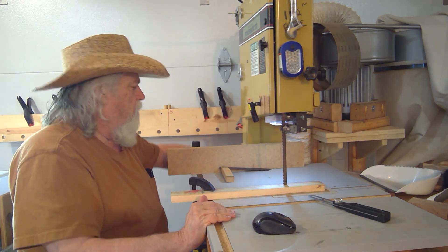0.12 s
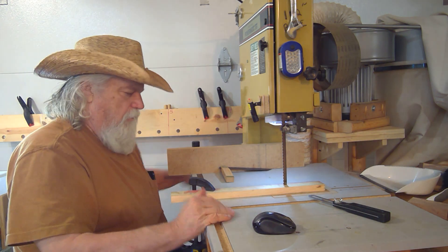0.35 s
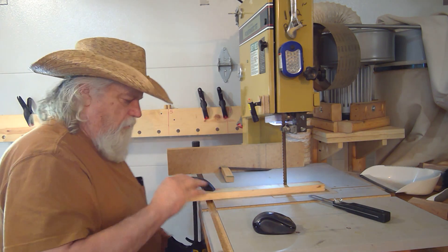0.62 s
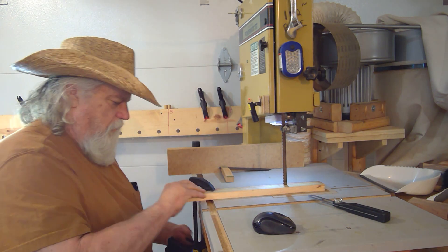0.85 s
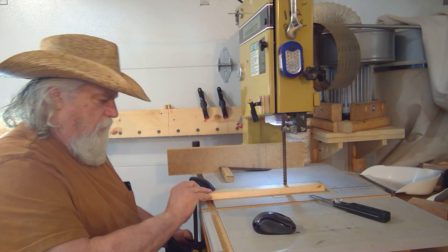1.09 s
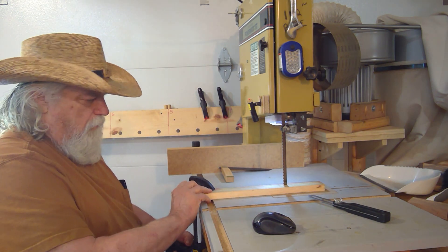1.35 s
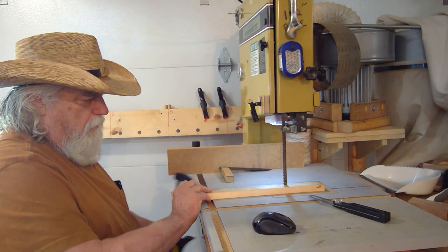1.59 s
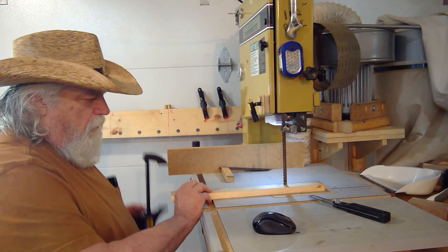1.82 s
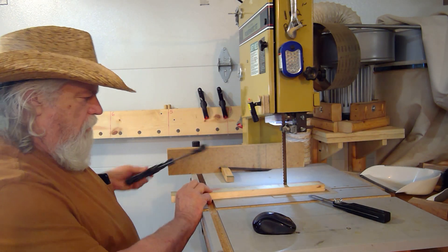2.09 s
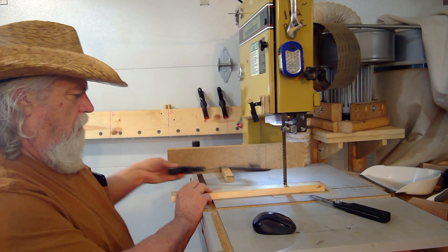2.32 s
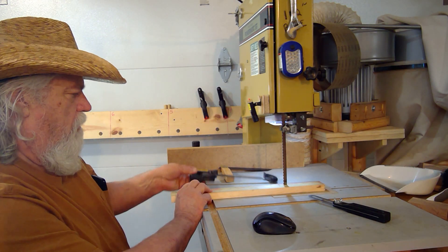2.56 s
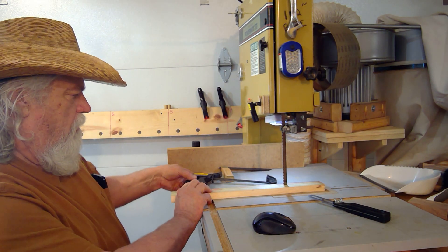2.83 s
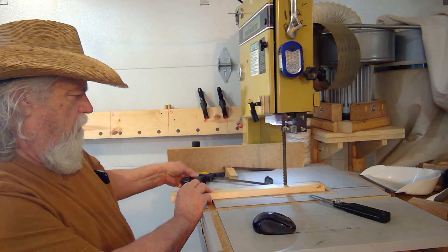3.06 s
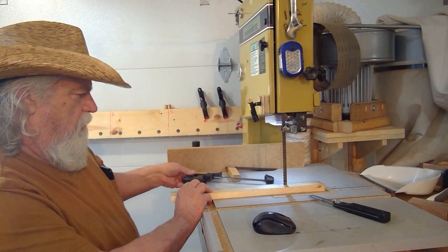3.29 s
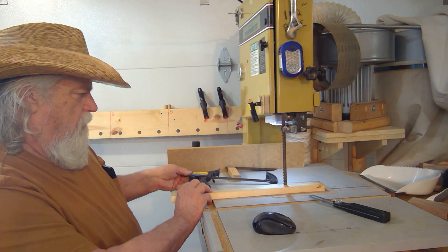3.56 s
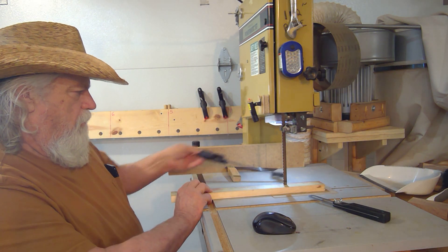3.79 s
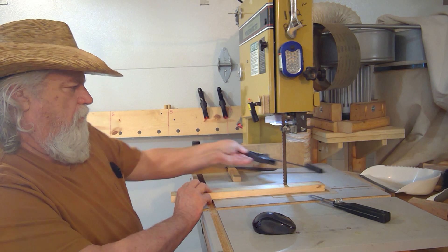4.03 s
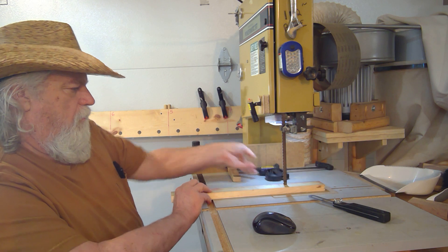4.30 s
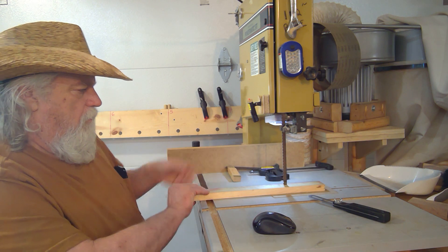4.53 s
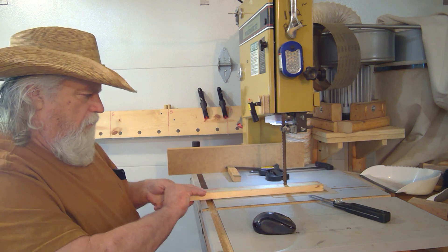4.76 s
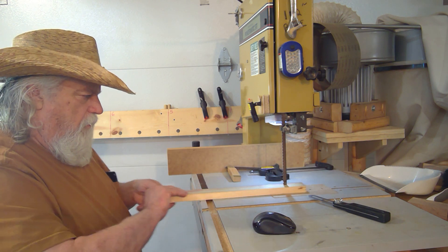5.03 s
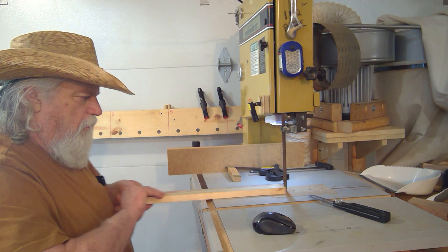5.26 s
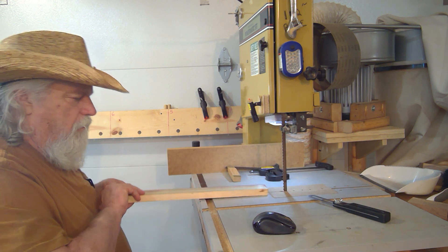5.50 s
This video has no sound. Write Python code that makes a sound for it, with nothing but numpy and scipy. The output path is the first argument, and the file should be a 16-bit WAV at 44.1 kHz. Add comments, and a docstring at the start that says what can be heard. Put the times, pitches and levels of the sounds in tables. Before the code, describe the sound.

In a small workshop, a bar clamp is loosened and set down with sharp knocks and clatter, then a wood strip scrapes across a metal table.

```python
"""In a small workshop, a bar clamp and a strip of wood are handled on the cast table of a saw.
Blows ring table, wood and bar as decaying modes with a rough rattle; clamp and strip drag and squeak
as stick-slip grains and noise through narrow resonances. Hand and sleeve rub as banded grains, thin tones
waver, the stand shakes as low noise, and a quiet room hum of noise and faint tones lies below."""
import sys
import numpy as np
from scipy import signal
from scipy.fft import rfft, irfft, next_fast_len
from scipy.io import wavfile
from scipy.ndimage import uniform_filter1d

SR = 44100
rng = np.random.default_rng(int(sys.argv[2]) if len(sys.argv) > 2 else 0)


def invert_db(level):
    """Linear amplitude ratio for a level in decibels (20 dB per decade), elementwise."""
    return 10 ** (np.asarray(level, dtype=float) / 20)


def to_wav(s):
    """Save 16-bit WAV."""
    ch = np.atleast_2d(s).T  # columns
    pcm = np.round(np.clip(ch, -1, 1) * 32767)  # PCM
    wavfile.write(sys.argv[1], SR, pcm.astype(np.int16))


N = 248439

# Colour of the room's noise floor. Each row: frequency in Hz, relative level in dB.
ROOM_TONE_COLOUR = [(15, -34.5), (25, 3), (105, -6.5), (153, -4.5), (236, -5), (451, -12), (677, -11.5),
                    (887, -17.5), (1020, -15), (1100, -17), (9840, -36), (11300, -35.5), (16000, -39)]
# Faint continuous pitches in the room. Each row: pitch in Hz, level in dB before a 9 dB lift, waver in dB.
HUM_TONES = [(240, -81, 2), (10890, -98, 2)]
# The stand sways as it is leant on. Each row: time in seconds, sway level in dB.
STAND_SWAY = [(0.0, -77.5), (1.32, -78), (1.55, -49), (1.69, -62.5), (2.45, -81), (2.49, -60), (2.9, -52),
              (2.95, -61.5), (3.23, -47.5), (3.39, -56), (3.78, -51.5), (3.98, -68), (4.58, -51),
              (4.83, -69), (5.36, -48), (5.63, -52)]
# How long the room rings. Each row: frequency in Hz, time to fall 60 dB in seconds.
ROOM_DECAY = [(150, 0.62), (300, 0.27), (600, 0.34), (1200, 0.26), (2400, 0.25), (4800, 0.24), (9600, 0.17),
              (14000, 0.082)]
# Stereo tilt. Each row: frequency in Hz, left over right in dB.
LEFT_OVER_RIGHT = [(60, -1.5), (200, 0.95), (500, 2), (1000, 3.5), (2000, 7), (4000, 6), (8000, 11.5),
                   (13000, 11)]
# Strokes of hand and sleeve. Each row: start, peak and fade mark in seconds (the mark sometimes
# before the peak), rub level and fine rustle level in dB.
HAND_STROKES = [(-.02, 0.005, 0.13, -48.5, -64.5), (.08, .36, 0.28, -49.5, -75.5),
                (0.357, 0.396, 0.34, -46, -84.5), (.5, .53, 0.71, -51, -63), (.84, .9, 1.05, -71, -66),
                (2.05, 2.125, 2.17, -69, -76.5), (2.18, 2.215, 2.27, -71, -70),
                (2.3, 2.46, 2.48, -64.5, -75.5), (2.56, 2.79, 2.875, -48.5, -60.5)]
# Colour of skin and cloth on wood. Each row: frequency in Hz, relative level in dB.
RUB_COLOUR = [(710, -56.5), (1200, -34.5), (1600, -16), (1680, -9.5), (2080, -6.5), (2520, -3),
              (4040, -1.5), (7290, -11.5), (9000, -28), (11700, -56), (19800, -120)]
# Thin wavering tones, heard while the clamp is in hand. Each row: pitch in Hz, level in dB.
BAR_TONES = [(5986, -92), (6503, -86), (7181, -95)]
# Metal and wood slipping, and the short tick of a light blow at 3.28 s. Each row: start in seconds, length in
# seconds, pitch in Hz, width in Hz, level in dB.
SQUEAKS_AND_TICK = [(2.189, .06, 1970, 250, -65), (3.277, 0.0086, 1970, 392, -39.5),
                    (3.276, 0.0099, 2400, 250, -56.5), (3.27, 0.024, 4336, 60, -70.5),
                    (4.658, 0.034, 3430, 49.5, -68), (4.836, 0.037, 2570, 50, -63),
                    (4.892, 0.021, 2570, 50, -65), (4.923, 0.02, 2572, 50.8, -56),
                    (5.259, .025, 1896, 80, -51.5), (5.477, 0.037, 2496, 78.4, -61.5),
                    (5.486, 0.053, 1880, 160, -58)]
# Passes of the clamp over the table. Each row of a pass: time in seconds, groan in dB, scratch in dB.
CLAMP_PASSES = [
    [(2.66, -52, -59), (2.7, -39.5, -74), (2.81, -70, -83), (2.9, -75, -99)],
    [(2.96, -37.5, -43.5), (3.01, -39.5, -43), (3.05, -36.5, -47.5), (3.218, -46, -74.5),
     (3.282, -46.5, -78), (3.336, -57, -97), (3.41, -62.5, -63)],
]
# Passes of the wood strip over the table. Each row of a pass: time in seconds, groan in dB, scratch in dB.
STRIP_PASSES = [
    [(4.62, -78, -92), (4.66, -53, -78), (4.74, -70, -108), (4.846, -67, -84.5), (4.97, -51.5, -64),
     (5.044, -37, -54.5), (5.152, -35.5, -51), (5.234, -36, -57), (5.276, -35, -46.5), (5.338, -33.5, -51),
     (5.49, -41.5, -61.5), (5.63, -56, -91)],
]
# The clamp catches on grit. Each row: time in seconds, grit in dB, fine grit in dB.
CLAMP_SNAGS = [(2.702, -61.5, -87), (2.977, -36.5, -45.5), (2.995, -62.5, -52), (3.04, -48, -61.5),
               (3.282, -75.5, -80)]
# The strip catches on grit. Each row: time in seconds, grit in dB, fine grit in dB.
STRIP_SNAGS = [(4.648, -72, -61.5), (4.671, -74, -74), (4.85, -60, -66.5), (4.874, -55, -70),
               (4.9, -52.5, -67), (4.935, -54.5, -64.5), (5.034, -59, -54), (5.06, -66.5, -60),
               (5.1, -56, -63), (5.152, -60, -60.5), (5.19, -60, -64), (5.276, -77, -68),
               (5.365, -50, -53.5), (5.488, -60, -76.5)]
# The table under the dragged clamp. Each row: mode in Hz, level in dB, time to fall 60 dB in seconds.
CLAMP_GROAN_MODES = [(213, -14, 0.14), (250, -5, 0.07), (340, 14, 0.019), (444, -7, 0.16), (514, -3.5, 0.1),
                     (580, -6.5, 0.049), (720, 1.5, 0.04), (785, -20, 0.17)]
# The low modes under the dragged strip. Each row: mode in Hz, level in dB, time to fall 60 dB in seconds.
STRIP_GROAN_MODES = [(220, -24, 0.052), (250, 12.5, 0.043), (340, 0, 0.11), (430, -1, 0.031),
                     (491.8, 4.5, 0.1), (536, 0.5, 0.043), (637, 0, 0.043), (720, -14, 0.034)]
# Resonances in the clamp's scratch. Each row: frequency in Hz, width in Hz, level in dB.
CLAMP_SCRATCH_PEAKS = [(1200, 23, 1.5), (1920, 100, 9.5), (3500, 38.2, -28), (3700, 45, -30),
                       (4160, 50, -40), (5680, 200, 1), (6550, 110, -2), (6900, 83, -20.5), (8900, 98, -15),
                       (9150, 120, -15), (10810, 57, -17.5), (11790, 130, -30), (13300, 44, -23.5),
                       (14300, 45, -11)]
# Resonances in the strip's scratch. Each row: frequency in Hz, width in Hz, level in dB.
STRIP_SCRATCH_PEAKS = [(1144, 34, -8.5), (1624, 27, 3), (1880, 58, 6), (2620, 250, 2.5), (3060, 51, -7.5),
                       (4180, 150, 8), (5200, 140, -0.5), (6400, 160, -18), (8330, 240, -9.5),
                       (9200, 120, -18), (9820, 82, -13), (11700, 140, -22), (12700, 300, -14),
                       (14900, 600, -10)]
# Every blow. Each row: time in seconds, knock in dB, thud in dB, crack in dB, favoured pitch in Hz.
BLOW_LIST = [(1.413, -7.5, -10, -20.5, 657), (1.418, -13.5, -19.5, -12.5, 470),
             (1.423, -17.5, -16, -27.5, 257.1), (1.445, -15.5, -21.5, -37, 160), (1.49, -30, -26, -46, 199),
             (1.896, -36, -45, -30, 4170), (2.475, -15.5, -25, -28, 1337),
             (2.658, -25.5, -42.5, -64.5, 375), (2.69, -28.5, -36.5, -62, 245),
             (2.712, -29.5, -34, -67, 380), (2.739, -49, -35.5, -45.5, 371),
             (2.954, -10.5, -30.5, -49.5, 514), (2.975, -28.5, -33, -33.5, 249),
             (3.018, -20, -37.5, -41.5, 360), (3.042, -25.5, -41, -34, 5620), (3.25, -48, -39, -76, 453),
             (3.423, -16, -32.5, -27, 5620), (3.444, -19, -35, -33.5, 363), (3.55, -19, -26.5, -77, 232.7),
             (3.593, -50, -39.5, -79, 230), (3.655, -19.5, -27.5, -34.5, 1773),
             (3.664, -27.5, -31.5, -40.5, 1550), (3.742, -27.5, -59.5, -62, 1380),
             (3.825, -35.5, -45, -97.5, 876), (4.107, -18, -28, -27.5, 2390), (4.11, -24, -40, -31, 3340),
             (4.112, -6, -27, -33.5, 749), (4.305, -17.5, -23, -27.5, 2690),
             (4.321, -20.5, -37, -43.5, 1035), (4.398, -9, -17.5, -24.5, 241),
             (4.419, -21.5, -29.5, -24.5, 247), (4.459, -36, -38.5, -47, 250)]
# The ranges knock, thud, clank, crack and snap. Each row: low edge in Hz, high edge in Hz,
# contact time in seconds, ring in dB, rattle in dB.
BLOW_RANGES = [(470, 1150, 0.0035, -18, -7.5), (126, 450, 0.0051, -6.5, -1.5), (1261, 3360, 0.0036, -17, 0),
               (3830, 6960, 0.0038, -19.5, 1), (7700, 14000, 0.002, -12, 2)]
# What table and clamp ring with. Each row: mode in Hz, level in dB, time to fall 60 dB in seconds.
BODY_MODES = [(132.6, -5.5, 0.056), (159, -8, 0.091), (217, -0.5, 0.2), (245, -3, 0.11), (259.2, -1.5, 0.3),
              (292, -4, 0.2), (352.4, -1, 0.22), (401, -0.5, .08), (470, 8, 0.036), (569, -3, 0.03),
              (657, -1, .08), (772.3, 2.5, 0.085), (810, 9, 0.014), (910, 3, 0.03), (1035, -4, 0.19),
              (1339, 17.5, 0.0061), (1320, -5.5, 0.014), (1550, -3.5, 0.013), (1780, -11.5, 0.19),
              (1820, -8, 0.027), (1880, 7, 0.027), (2106, -2.5, 0.092), (2203, -12.5, 0.067),
              (2440, -6, 0.042), (2551, -7.5, 0.035), (2800, 3, 0.026), (3100, -2, .03), (3340, 5, 0.035),
              (3930, -5, .03), (4170, 1, .03), (4950, 2.5, 0.011), (5300, -8, 0.05), (5620, -1.5, 0.12),
              (6580, -6, 0.018), (7700, 0, 0.062)]


def rms_one(x):
    """Scaled to unit rms."""
    return x / np.sqrt(np.mean(x ** 2) + 1e-20)


def at_hz(points, hz):
    """Table value on a log-frequency axis."""
    table_hz, values = np.array(points).T
    return np.interp(np.log(hz), np.log(table_hz), values)


def band(x, low_hz, high_hz, order=2):
    """Butterworth band-pass."""
    edges_hz = [low_hz, min(high_hz, .45 * SR)]
    return signal.sosfilt(signal.butter(order, edges_hz, "band", fs=SR, output="sos"), x)


def coloured(x, spectrum):
    """Steady noise given a spectrum in dB, at unit rms."""
    hz = np.maximum(np.fft.rfftfreq(N, 1 / SR), 1)
    return rms_one(irfft(rfft(x) * invert_db(at_hz(spectrum, hz)), N))


def ring(force, hz, t60):
    """A damped mode: a unit click sets a sine of height 1 ringing."""
    radius = invert_db(-60 / (t60 * SR))
    turn = 2 * np.pi * hz / SR
    poles = [1, -2 * radius * np.cos(turn), radius * radius]
    return signal.lfilter([0, np.sin(turn)], poles, force + 1e-18)


def grains(per_s, spread_db):
    """Random clicks of uneven size and either sign, at unit rms."""
    sizes = invert_db(spread_db * np.minimum(rng.exponential(1, N), 5)) * rng.choice([-1, 1], N)
    return rms_one(sizes * (rng.random(N) < per_s / SR))


def waver(per_s):
    """Slow random wander: normal steps, two per cycle, joined by straight lines."""
    steps = rng.standard_normal(N // 300 + 2)
    return np.interp(np.arange(N) * 2 * per_s / SR, np.arange(len(steps)), steps)


def gains(tables):
    """Level curves to gains in time, with 20 ms fades outside each table."""
    t, out = np.arange(N) / SR, 0
    for rows in tables:
        s, *columns = np.transpose(rows)
        fade = np.clip(np.minimum(t - s[0] + .02, s[-1] + .02 - t) / .02, 0, 1)
        out = out + fade * invert_db(np.array([np.interp(t, s, c) for c in columns]))
    return out


def bumps(peak_s, rise_db_per_s, fall_db_per_s, *levels_db):
    """Gains that rise to each peak and fall away, straight in dB; overlaps add in power."""
    age = np.arange(0, N + 32, 32) / SR - np.asarray(peak_s)[:, None]   # one point every 32 samples
    rise = age * np.reshape(rise_db_per_s, (-1, 1))
    fall = -age * np.reshape(fall_db_per_s, (-1, 1))
    shape = invert_db(np.where(age < 0, rise, fall))
    at, points = np.arange(N) / 32, np.arange(age.shape[1])
    return [np.interp(at, points, np.sqrt(invert_db(db) ** 2 @ shape ** 2)) for db in levels_db]


def room_tone():
    """Faint broad noise, alike on both sides in the bass, with two faint continuous tones that waver slightly."""
    level_db = -67.5
    mid, left, right = (coloured(rng.standard_normal(N), ROOM_TONE_COLOUR) for k in range(3))
    side = band(np.array([left, right]), 500, 17000, order=1)
    bass_mid = mid - band(mid, 420, 17000, order=1)
    t, hum = np.arange(N) / SR, 0
    for hz, db, waver_db in HUM_TONES:
        hum = hum + invert_db(db + 9 + waver_db * waver(2.1)) * np.sin(2 * np.pi * hz * t)
    return invert_db(level_db) * (side + bass_mid) + hum


def shake():
    """Low sway and boom carried through the floor, a little different on each side; thuds jolt the boom."""
    boom_over_sway_db, jolt_over_thud_db, jolt_t60_s = -0.5, -30.5, 0.34
    sway, = gains([STAND_SWAY])
    s, thud_db = np.transpose(BLOW_LIST)[[0, 2]]
    jolts = bumps(s + 0.0067, 1500, 60 / jolt_t60_s, thud_db + jolt_over_thud_db)[0]
    boom = invert_db(boom_over_sway_db) * sway + jolts
    mid, own = rng.standard_normal((2, 1, N)), rng.standard_normal((2, 2, N))
    low, high = mid + 0.28 * own
    return sway * rms_one(band(low, 32, 47)) + boom * rms_one(band(high, 78, 110))


def workshop(x):
    """Dense reflections: a strong early cluster off table and machine, then a tail dying band by band."""
    early_db, early_t60_s = 1, 0.02
    t = np.arange(SR // 2) / SR
    echo, edges_hz = 0, 100 * 2 ** np.arange(0, 7.5, 1 / 3)
    for low_hz, high_hz in zip(edges_hz, edges_hz[1:]):
        shared, own = rng.standard_normal(len(t)), rng.standard_normal((2, len(t)))
        apart = np.clip(0.3 + 0.25 * np.log2(low_hz / 200), .1, .95)   # the two sides share the bass
        noise = np.sqrt(1 - apart ** 2) * shared + apart * own
        tail = invert_db(-60 * t / at_hz(ROOM_DECAY, low_hz))
        early = invert_db(early_db - 60 * t / early_t60_s)
        onset = np.clip((t - .001) / 0.0022, 0, 1)
        part = band(noise * (tail + early) * onset, low_hz, high_hz)
        energy = np.sum(part ** 2, axis=1, keepdims=True)
        even = np.sqrt((high_hz - low_hz) / (SR / 2) / energy)   # no band is favoured
        bass_loss = invert_db(-5 * np.clip(np.log2(500 / low_hz), 0, 1))   # thin walls let the bass out
        echo = echo + part * even * bass_loss
    return signal.fftconvolve(x[None], echo, axes=1)[:, :N]


def strokes():
    """Rub and rustle gains that swell and fade in dB; nothing sounds before a stroke starts."""
    swell_db, fade_db = 14, 26.5   # start and fade mark lie this far under the peak
    t, out = np.arange(N) / SR, 0
    for start, peak, mark, *levels_db in HAND_STROKES:
        curve_db = np.interp(t, [start, peak, mark, mark + .1], [-swell_db, 0, -fade_db, -80])
        shape = invert_db(curve_db) * np.clip((t - start) / 0.021, 0, 1)
        out = out + invert_db(np.array(levels_db))[:, None] * shape
    return out


def rubs():
    """Skin and cloth on wood: dense grains in a broad band, a finer rustle above."""
    rub, rustle = strokes()
    skin = coloured(grains(6400, 1.2), RUB_COLOUR)
    cloth = rms_one(band(grains(9000, 2.6), 6900, 16000, order=4))
    return rub * skin + rustle * cloth


def sing():
    """The steel bar's thin tones: sines wavering in level."""
    from_s, to_s, waver_db = 1.6, 4.1, 6
    t, tones = np.arange(N) / SR, 0
    held = np.clip(np.minimum(t - from_s, to_s - t) / .1, 0, 1)
    for hz, db in BAR_TONES:
        tones = tones + invert_db(db + waver_db * waver(3)) * np.sqrt(2) * np.sin(2 * np.pi * hz * t)
    return held * tones


def squeaks():
    """Each slip, and the short tick of a blow, is a puff of noise through a narrow resonance."""
    out, t = np.zeros(N), np.arange(N) / SR
    for s, length, hz, width, db in SQUEAKS_AND_TICK:
        part = slice(int(s * SR), int((s + 2 * length) * SR))
        age = (t[part] - s) / length
        noise = rng.standard_normal(4410)
        tone = rms_one(band(noise, hz - width / 2, hz + width / 2))[-len(age):]
        puff = np.clip(8 * age, 0, 1) * np.exp(-age ** 3)
        out[part][:len(tone)] += invert_db(db) * tone * puff[:len(tone)]
    return out


def drag(passes, snags, modes, resonances, hiss):
    """Stick-slip grains shake the low modes; finer grit hisses and rings resonances under uneven pressure."""
    snag_rise_db_per_s, snag_fall_db_per_s = 1500, 264
    grit_db, fine_grit_db = -17.5, -27   # steady grit against the scratch
    groan, scratch = gains(passes)
    s, *snag_db = np.transpose(snags)
    grit, fine_grit = bumps(s, snag_rise_db_per_s, snag_fall_db_per_s, *snag_db)
    levels = scratch, grit + invert_db(grit_db) * scratch, fine_grit + invert_db(fine_grit_db) * scratch
    slips = grains(1500, 3.0)
    body = sum(invert_db(db + 3.6 * waver(18)) * ring(slips, hz, t60) for hz, db, t60 in modes)
    out = groan * rms_one(band(body, 210, 720))
    for level, low_hz, high_hz in zip(levels, [950, 3600, 8000], [3600, 8000, 16000]):
        fine, rings = grains(4000, 1.3), 0
        for hz, width, db in resonances:
            if low_hz < hz < high_hz:
                # a narrower resonance rings longer
                rings = rings + invert_db(db + 6 * waver(15)) * rms_one(ring(fine, hz, 2.2 / width))
        texture = rms_one(rings) + hiss * rms_one(band(fine, low_hz, high_hz))
        pressure = invert_db(3.9 * waver(30))
        out += level * pressure * rms_one(texture)
    return out


def strengths():
    """Each blow's strength in the five ranges; a blunt blow loses treble steadily."""
    clank_share, snap_share, snap_db = 0.52, 1.2, -4   # shares of the step from knock to crack
    bar_hz, bar_oct, bar_db = 2200, 0.86, 14.5   # a blow that favours the steel bar's pitch clanks harder
    s, knock, thud, crack, favoured_hz = np.transpose(BLOW_LIST)
    bar = bar_db * np.exp(-(np.log2(favoured_hz / bar_hz) / bar_oct) ** 2)
    clank = knock + clank_share * (crack - knock) + bar
    snap = knock + snap_share * (crack - knock) + snap_db
    return knock, thud, clank, crack, snap


def blows():
    """In each range a contact gives a clean tap that rings the modes and a rough rattle that swells and dies."""
    favour_peak_db, favour_oct, tick_db = 11.5, 0.12, 4.5
    at_s, favoured_hz = np.transpose(BLOW_LIST)[[0, -1]]
    span = np.arange(1500)
    at, out = np.round(at_s * SR).astype(int)[:, None] + span, np.zeros(N)
    chatter = uniform_filter1d(rng.standard_normal(at.shape), size=36, axis=1) * 6
    ticks = invert_db(tick_db * chatter)   # the contact chatters unevenly
    for (low_hz, high_hz, contact_s, ring_db, rattle_db), strength_db in zip(BLOW_RANGES, strengths()):
        age = span / SR / contact_s
        swell = np.minimum(1.8 * age + 0.041, 1) * np.exp(-age)
        rough = ticks * rng.standard_normal(at.shape) * swell
        rattle = np.zeros(N)
        np.add.at(rattle, at, rough * invert_db(strength_db)[:, None])
        width_gain = np.sqrt(SR / 2 / (high_hz - low_hz))   # makes up for the noise the band removes
        out += invert_db(rattle_db) * width_gain * band(rattle, low_hz, high_hz)
        for hz, level_db, t60 in BODY_MODES:
            if low_hz <= hz < high_hz:
                octaves_up = np.log2(hz / favoured_hz)
                favour_db = favour_peak_db * np.exp(-(octaves_up / favour_oct) ** 2)
                favour_db -= 0.94 * np.maximum(octaves_up, 0)   # a blunt blow feeds high modes less
                chance_db, sign = 0.2 * rng.standard_normal(len(at)), rng.choice([-1, 1], len(at))
                taps = np.zeros(N)
                taps[at[:, 0]] = sign * invert_db(strength_db + ring_db + level_db + favour_db + chance_db)
                # the ring takes a few cycles to build
                out += band(ring(taps, hz, t60), hz / 1.4, hz * 1.3, order=1)
    return signal.sosfilt(signal.butter(4, 125, "high", fs=SR, output="sos"), out)


def scene():
    """All sources, dry and through the room."""
    hand_pan_db, room_db = 2, -0.5   # pan is left over right
    clamp_drag = drag(CLAMP_PASSES, CLAMP_SNAGS, CLAMP_GROAN_MODES, CLAMP_SCRATCH_PEAKS, hiss=0.8)
    clamp = blows() + squeaks() + clamp_drag
    hand = rubs()
    strip = drag(STRIP_PASSES, STRIP_SNAGS, STRIP_GROAN_MODES, STRIP_SCRATCH_PEAKS, hiss=0.9)
    side = np.array([[.5], [-.5]])
    direct = clamp + hand * invert_db(hand_pan_db * side) + strip
    reflected = invert_db(room_db) * workshop(clamp + hand + strip)
    return direct + reflected + sing() + shake() + room_tone()


def top_cut(x):
    """Nothing passes above the cut-off."""
    return signal.sosfilt(signal.butter(12, 16980, fs=SR, output="sos"), x)


def record(dry):
    """The left side faces the work: brighter and a little earlier; peaks are rounded."""
    left_lead_s = 6e-5
    size = next_fast_len(N + 4096)
    hz = np.maximum(np.fft.rfftfreq(size, 1 / SR), 1)
    # half the level and time difference goes to each side
    half = invert_db(at_hz(LEFT_OVER_RIGHT, hz) / 2) * np.exp(1j * np.pi * hz * left_lead_s)
    balance = 2 / (abs(half) + 1 / abs(half))   # the two gains average 1
    sides = irfft(rfft(dry, size) * [half, 1 / half] * balance, size)[:, :N]
    rounded = 1.231 * np.tanh(sides / 1.474)
    return top_cut(rounded)


dry = scene()
out = record(dry)
to_wav(out)
```